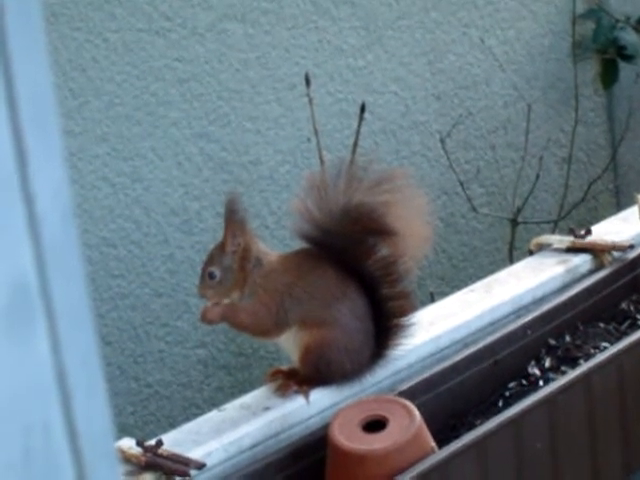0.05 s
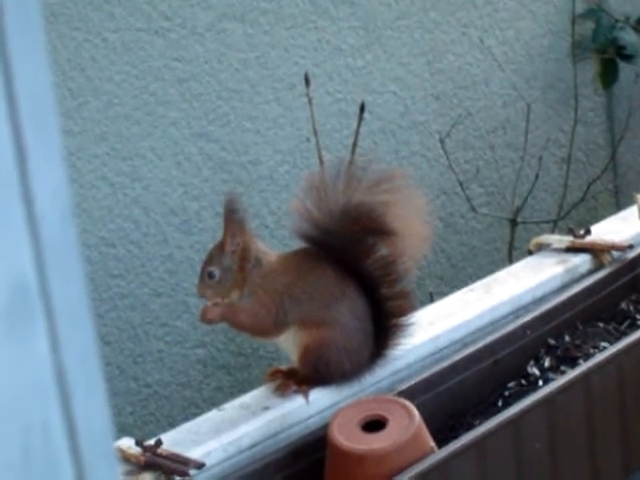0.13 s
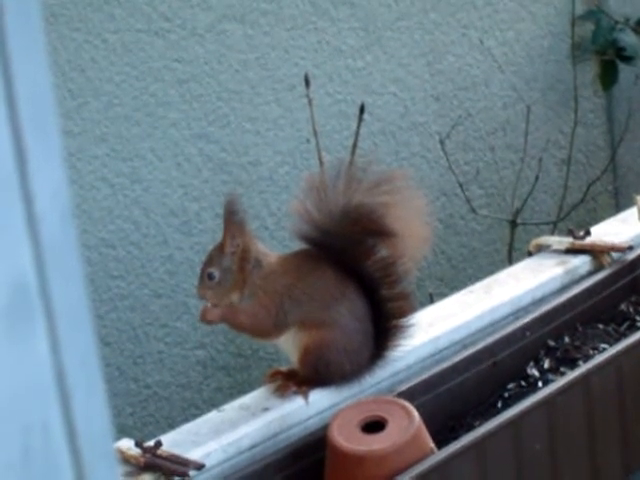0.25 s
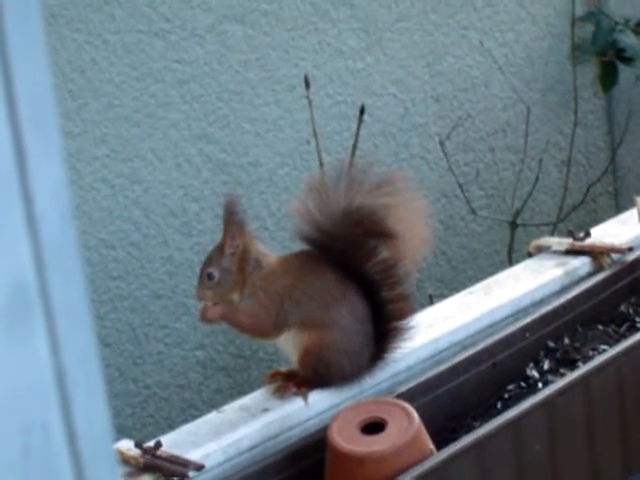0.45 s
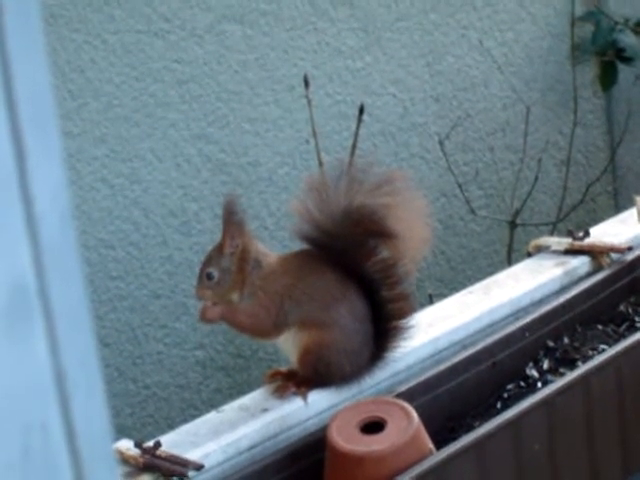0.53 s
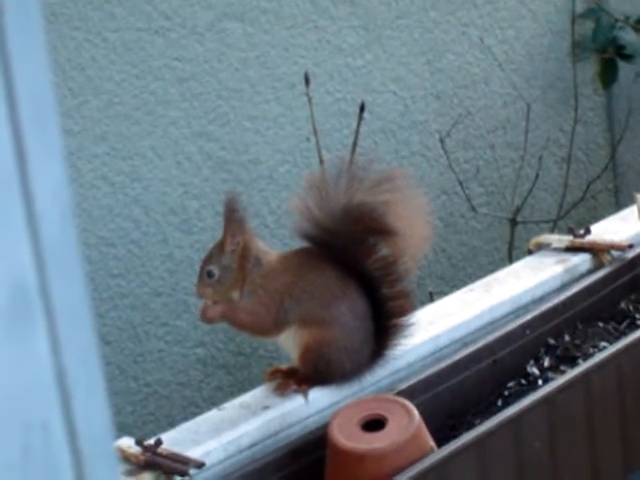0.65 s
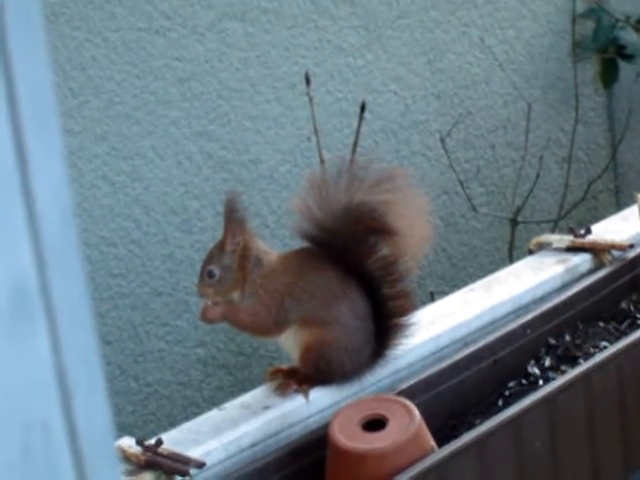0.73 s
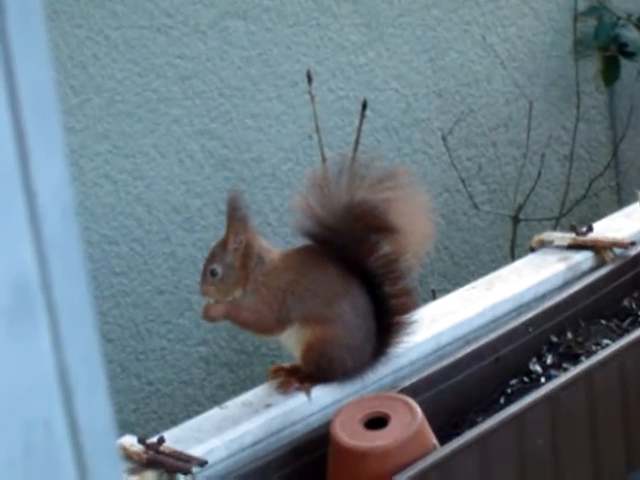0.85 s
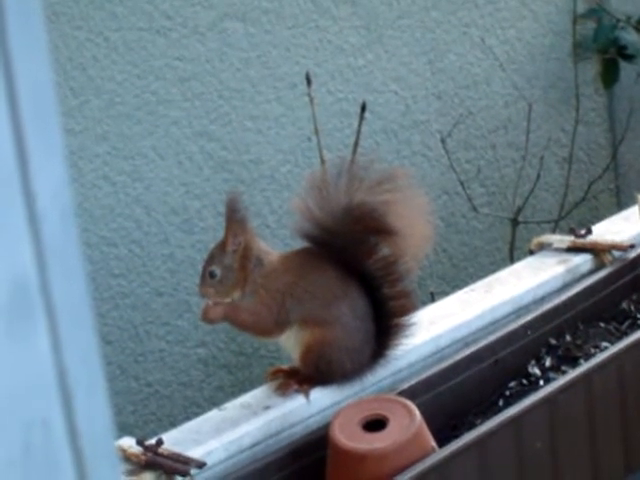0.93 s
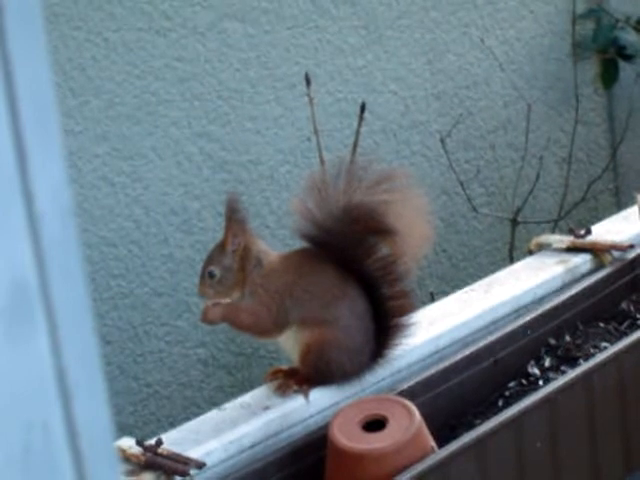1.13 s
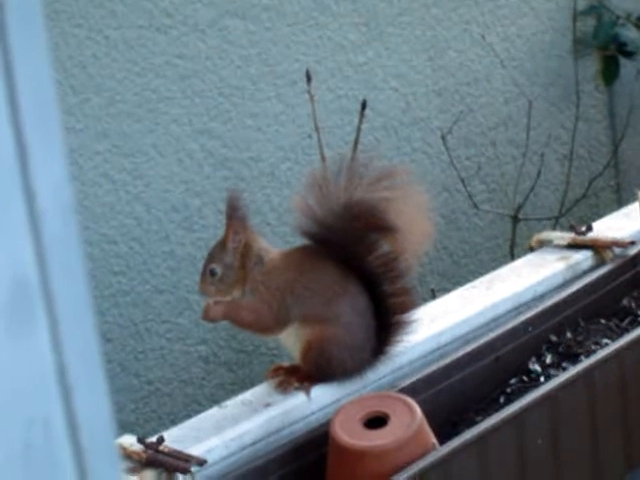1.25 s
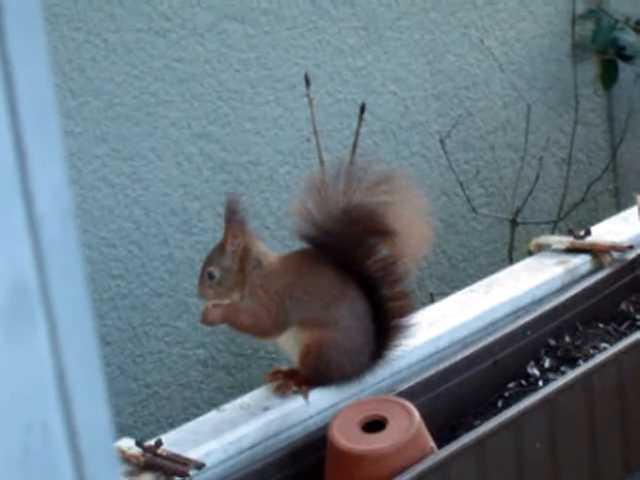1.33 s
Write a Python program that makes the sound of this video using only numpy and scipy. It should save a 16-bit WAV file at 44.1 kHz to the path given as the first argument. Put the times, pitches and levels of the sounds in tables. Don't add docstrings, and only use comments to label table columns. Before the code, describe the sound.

A squirrel cracks a nutshell: one sharp, dry, woody click at about 0.25 seconds, a tight cluster of snaps lasting roughly ten milliseconds, with a hollow knock and faint, dull balcony tail. Treble thins briefly until 0.27. Quiet, steady camera hiss runs throughout, above distant low engine hum and soft town rumble that swells and dips, rising slightly near 1.4 seconds. No further clicks.

```python
import sys
import numpy as np
from scipy import signal
from scipy.fft import rfft, irfft, next_fast_len
from scipy.io import wavfile
from scipy.ndimage import uniform_filter1d, map_coordinates

SR = 44100
rng = np.random.default_rng(int(sys.argv[2]) if len(sys.argv) > 2 else 0)


def wav_out(sig):
    wavfile.write(sys.argv[1], SR, np.round(np.clip(np.atleast_2d(sig).T, -1, 1) * 32767).astype(np.int16))


def invert_db(level):
    return 10 ** (np.asarray(level, dtype=float) / 20)


N = 61739


def unit(x):
    return x / np.sqrt(np.mean(x ** 2) + 1e-20)


def along(points, hz):
    f, value = np.transpose(points)
    return np.interp(np.log(hz + 1), np.log(f + 1), value)


def wobble(rate):
    return map_coordinates(rng.standard_normal(200), [np.arange(N) * rate / SR])


def filtered(x, response):
    m = next_fast_len(N + 8192)
    spectrum = rfft(x, m) * response(np.fft.rfftfreq(m, 1 / SR))
    return irfft(spectrum, m)[..., :N]


def noise(spectrum):
    return unit(filtered(rng.standard_normal(N), lambda hz: invert_db(along(spectrum, hz))))


def ring(start, hz, db, rise, t60):
    t = np.maximum(np.arange(N) / SR - start, 0)
    fade = invert_db(db - 60 * t / t60)
    return fade * (1 - np.exp(-t / rise)) * np.sin(2 * np.pi * hz * t)


# (time [s], level [dB])
TRAFFIC_LEVEL = [
    (0, -68.5),
    (.45, -74),
    (.62, -62.5),
    (.72, -63.5),
    (.8, -79),
    (.93, -65.5),
    (1.1, -83.5),
    (1.3, -65.5),
    (1.4, -60.5),
]
# (frequency [Hz], level [dB per Hz])
RUMBLE_COLOUR = [(120, -17), (200, -16.5), (290, 3), (380, -8), (600, -52)]


def town():
    time, db = np.transpose(TRAFFIC_LEVEL)
    level_db = np.interp(np.arange(N) / SR, time, db) - 0.5 + 3 * wobble(9.3)
    return invert_db(level_db) * noise(RUMBLE_COLOUR)


# (frequency [Hz], level [dB per Hz])
HISS_COLOUR = [(15, -40), (30, -8), (100, -2.5), (200, 3), (500, -1), (900, -3), (3000, -10),
               (10000, -12.5)]


def hiss():
    whine = np.sqrt(2) * invert_db(-89) * np.sin(2 * np.pi * 8000 * np.arange(N) / SR)
    level_db = -59 + 0.77 * wobble(30.12)
    return invert_db(level_db) * noise(HISS_COLOUR) + whine


def holes(x):
    share, above_hz, loss_db = 0.07, 4800, -24
    hz, _, z = signal.stft(x, SR, nperseg=256)
    field = uniform_filter1d(rng.standard_normal(z.shape), size=4, axis=0)
    field = unit(uniform_filter1d(field, size=6, axis=1))
    skip = (field > np.quantile(field, 1 - share)) & (hz[:, None] > above_hz)
    return signal.istft(z * invert_db(loss_db * skip), SR, nperseg=256)[1][:N]


# (frequency [Hz], level [dB rms])
ENGINE_TONES = [(65, -83), (90, -80), (129.3, -74.5), (195, -71), (260, -92.5)]


def engine():
    drift_hz, swell_db = 2.21, 1.5
    hum = np.zeros(N)
    for hz, db in ENGINE_TONES:
        level = np.sqrt(2) * invert_db(db + swell_db * wobble(11))
        phase = 2 * np.pi * np.cumsum(hz + drift_hz * wobble(11)) / SR
        hum += level * np.sin(phase)
    return hum


def balcony(near):
    level_db, t60_s, dull_above_hz = -29.5, 0.44, 870
    fade = invert_db(-60 * np.arange(N) / SR / t60_s)
    tail = filtered(rng.standard_normal(N), lambda hz: 1 / (1 + (hz / dull_above_hz) ** 4)) * fade
    wet = near + invert_db(level_db) * signal.fftconvolve(near, tail / np.linalg.norm(tail))[:N]
    low_cut = signal.butter(2, 94, "high", fs=SR, output="sos")
    return signal.sosfilt(low_cut, wet)


# (time [s], frequency [Hz], level [dB], rise [s], fade by 60 dB [s])
POT_RINGS = [
    (.247, 823, -14.5, 0.00057, 0.0052),
    (.2508, 666, -20, 0.0028, 0.02),
    (.2595, 498, -39, 0.0011, 0.034),
]


def pot():
    return sum(ring(*row) for row in POT_RINGS)


# (frequency [Hz], level [dB], fade by 60 dB [s])
SHELL_TONES = [(187, -42.5, 0.049), (565, -25, 0.014), (1190, -11.5, 0.0072), (1716, -0.5, 0.0055),
               (2196, -10.5, 0.007), (2795, -22, .012), (3376, -15.5, 0.0049), (4700, -31, 0.0068),
               (6220, -39, 0.0085)]


def nut():
    t = np.arange(N) / SR
    steps = [(0.2416, -24), (0.2498, -12)]
    for k in range(5):
        steps.append((0.2446 + k * 0.001224, 3 - k * 8.5))

    shell, burst = np.zeros(N), np.zeros(N)
    rise_s, crack_t60_s, bright_above_hz = 0.0022, 0.0074, 3000
    for start, db in steps:
        for hz, level, t60 in SHELL_TONES:
            shell += ring(start, hz, db + level, 0.0016, t60)
        fade = invert_db(db - 32.5 - 60 * np.abs(t - start) / crack_t60_s)
        burst += np.clip((t - start) / rise_s, 0, 1) * fade
    splinter = filtered(rng.standard_normal(N), lambda hz: hz ** 2 / (hz ** 2 + bright_above_hz ** 2))
    return shell + burst * unit(splinter)


def scene():
    background = holes(town() + hiss()) + engine()
    return (background + balcony(nut() + pot()))[None]


def low_pass(x):
    return signal.sosfilt(signal.butter(12, 10110, fs=SR, output="sos"), x)


# (start [s], end [s], lost above [Hz], loss [dB])
TREBLE_GAPS = [
    (.2388, .2415, 2500, -12),
    (.252, .2742, 3000, -20),
    (.2572, .2742, 1150, -28),
]
# (time [s], frequency [Hz], level [dB], length [s])
THIN_CHIRPS = [
    (.2555, 5800, -69, .0012),
    (.2698, 5900, -68, .0014),
]


def record(dry):
    t, x = np.arange(N) / SR, dry
    for start, end, hz, db in TREBLE_GAPS:
        gap = np.clip(np.minimum(t - start, end - t) / 0.002 + 0.5, 0, 1)
        treble = filtered(x, lambda f: 1 / (1 + (hz / (f + 1)) ** 20))
        x = x - (1 - invert_db(db * gap)) * treble
    for time, hz, db, length in THIN_CHIRPS:
        x = x + invert_db(db) * np.exp(-((t - time) / length) ** 2) * np.sin(2 * np.pi * hz * t)
    x = filtered(x, lambda hz: np.clip((10100 - hz) / 60, 0, 1))
    x = x + invert_db(-97) * rng.standard_normal(x.shape)
    return low_pass(x)


dry = scene()
out = record(dry)
wav_out(out)
```